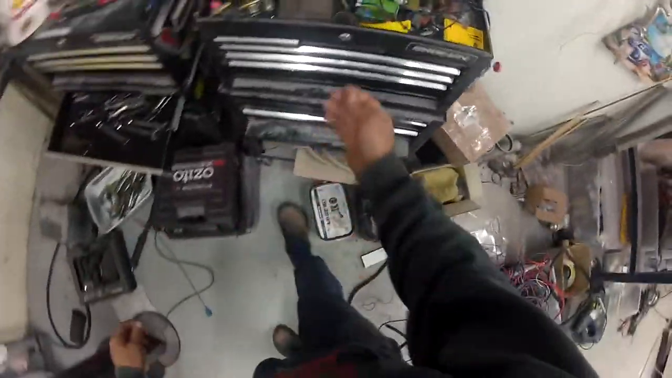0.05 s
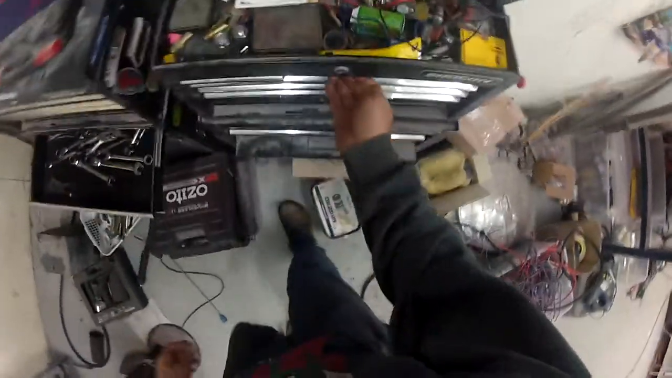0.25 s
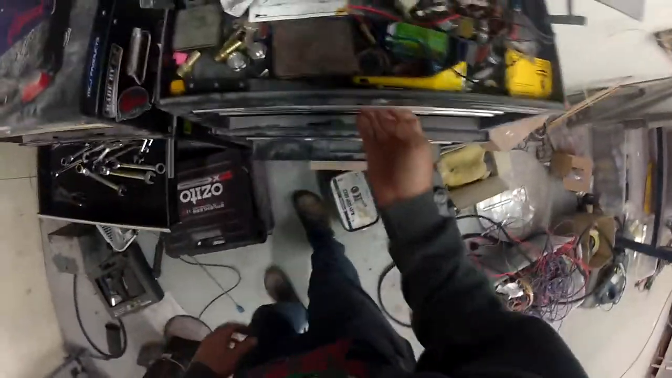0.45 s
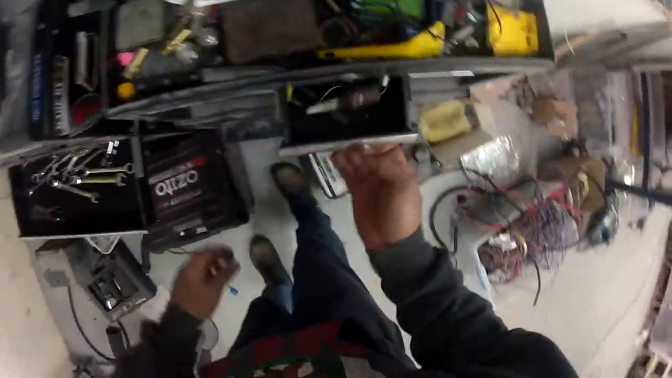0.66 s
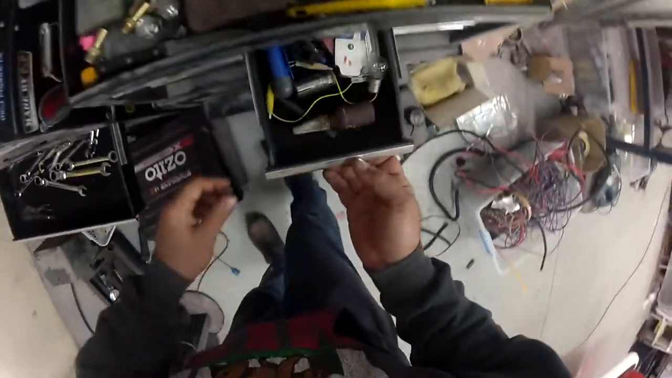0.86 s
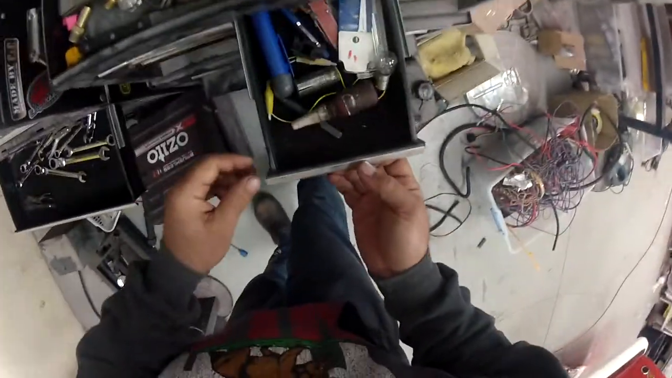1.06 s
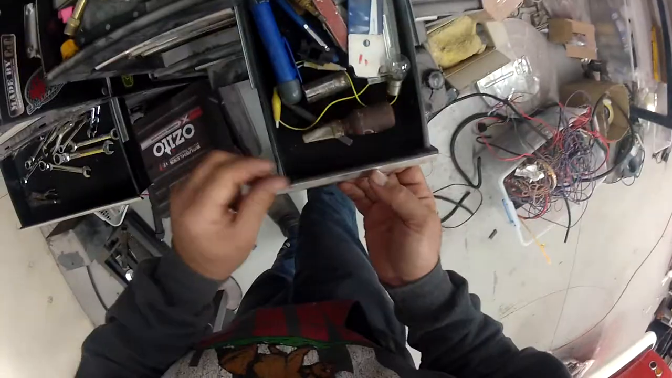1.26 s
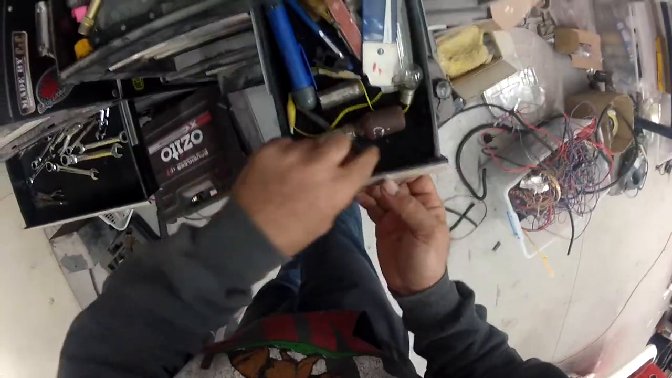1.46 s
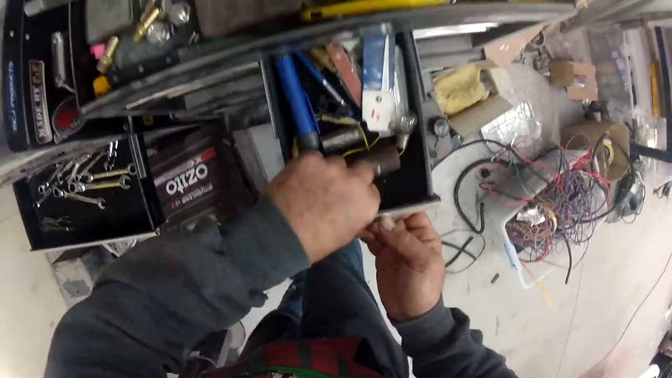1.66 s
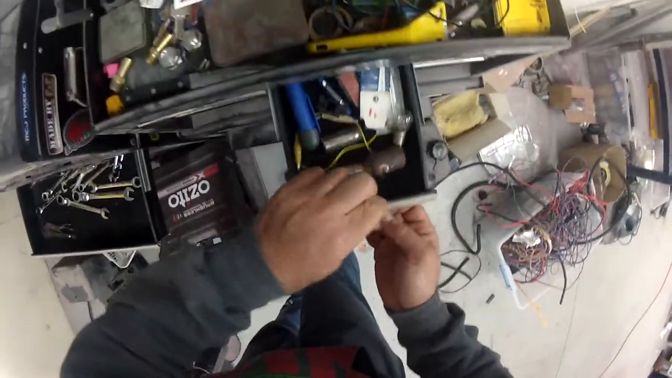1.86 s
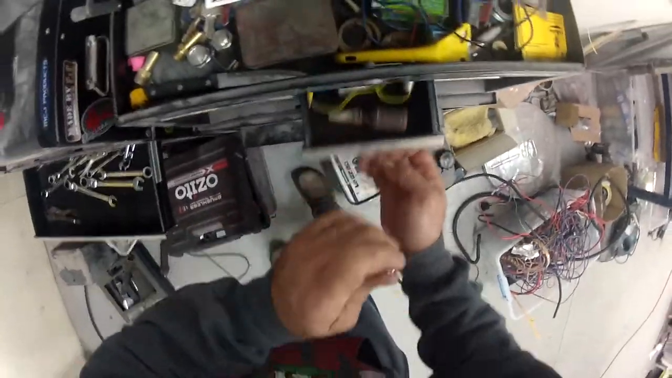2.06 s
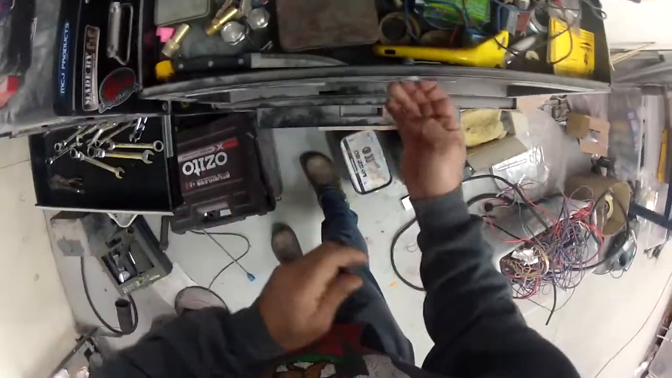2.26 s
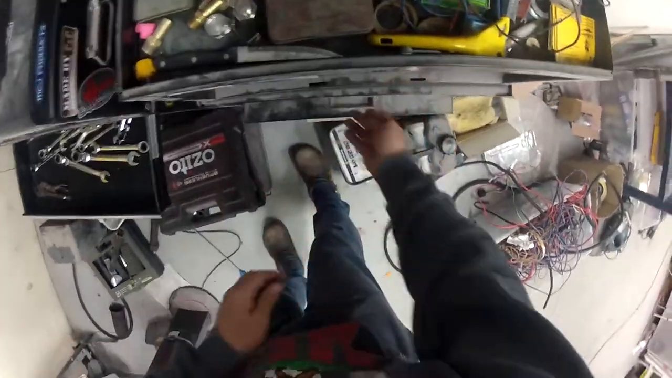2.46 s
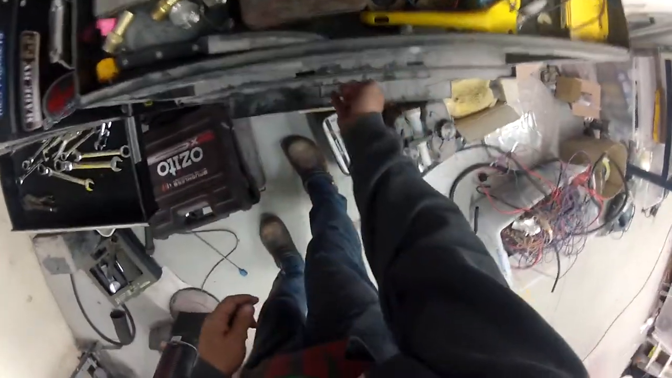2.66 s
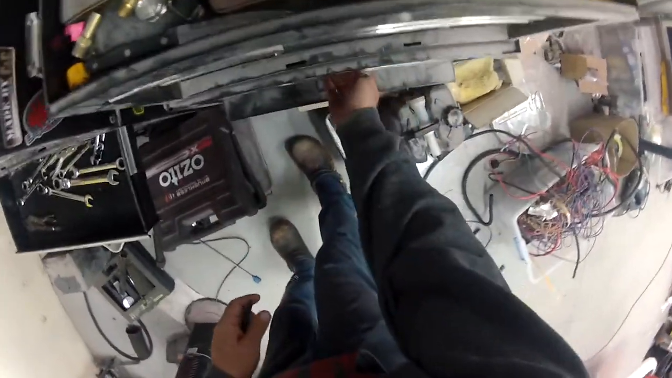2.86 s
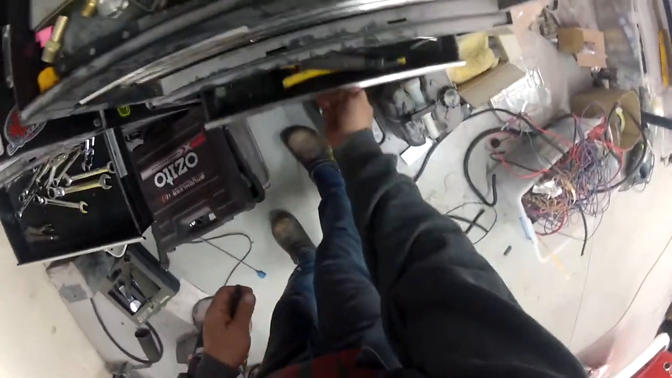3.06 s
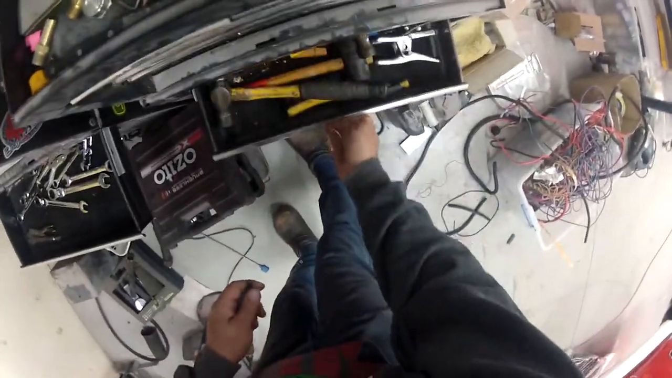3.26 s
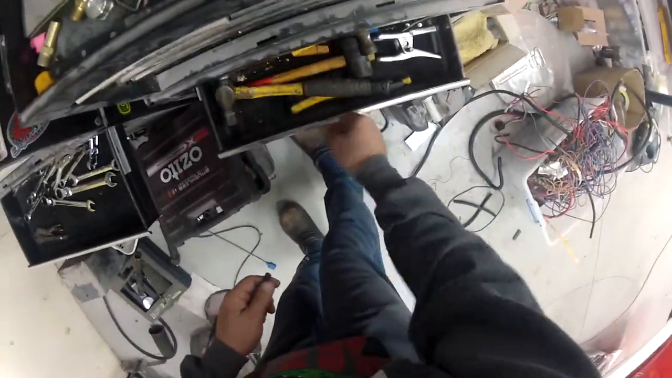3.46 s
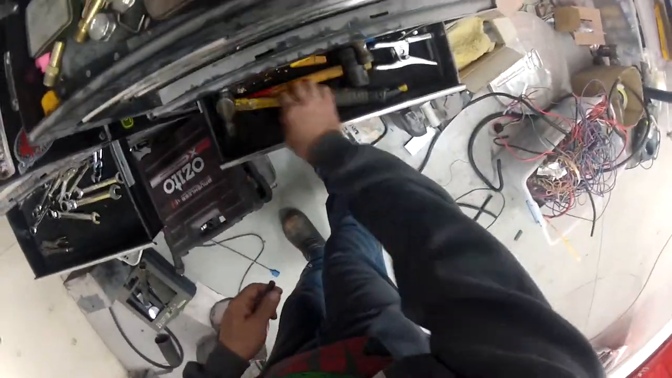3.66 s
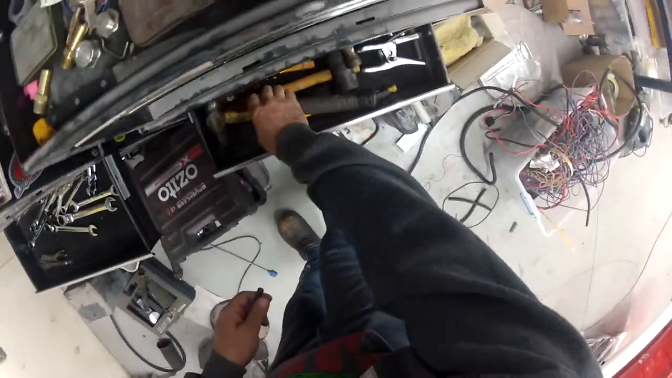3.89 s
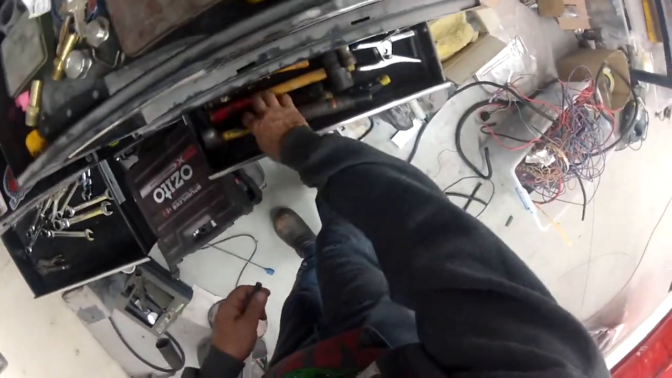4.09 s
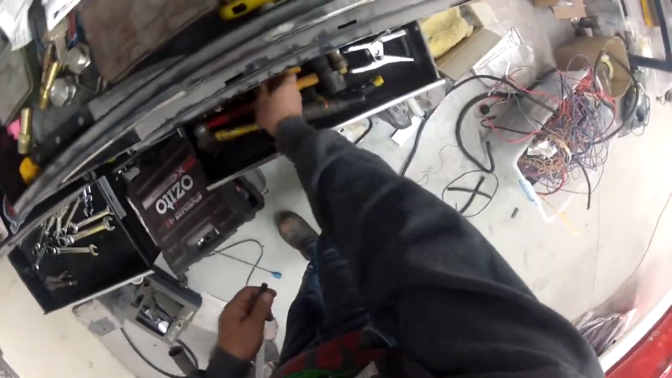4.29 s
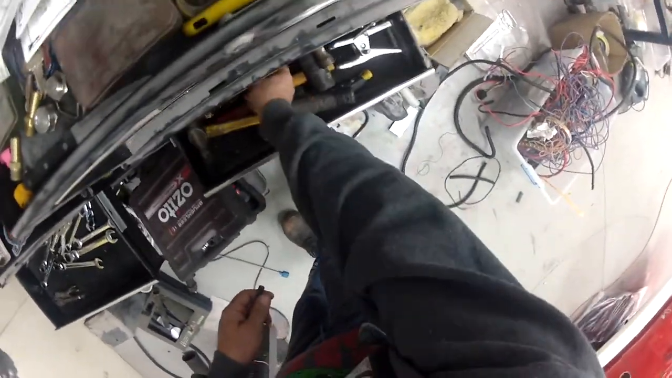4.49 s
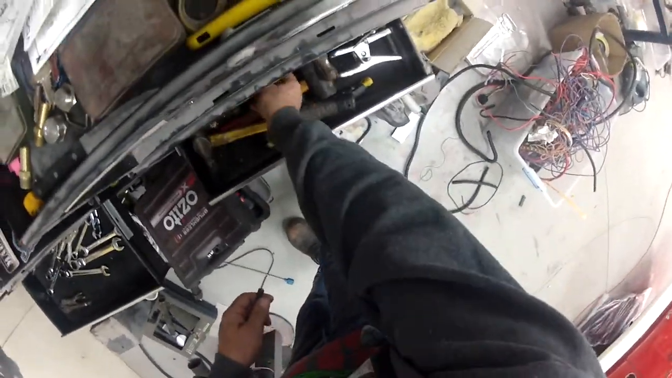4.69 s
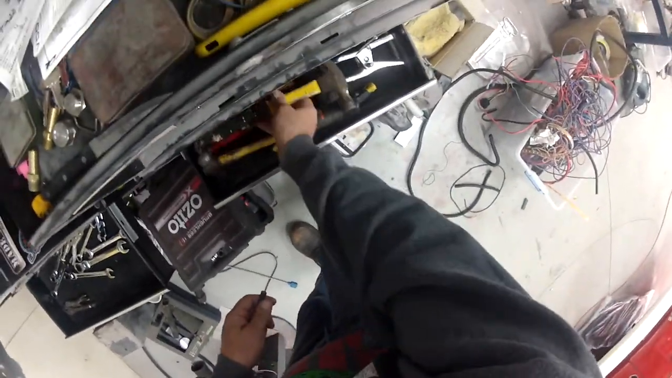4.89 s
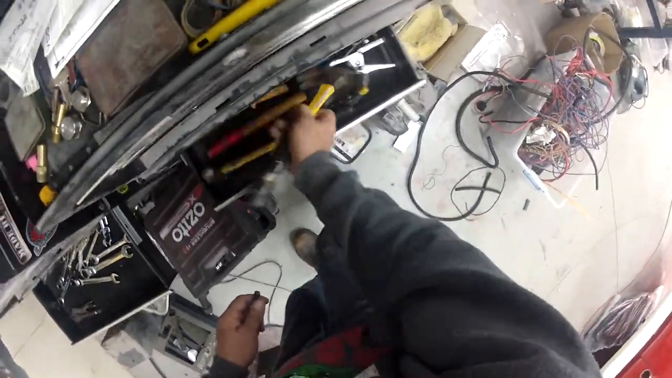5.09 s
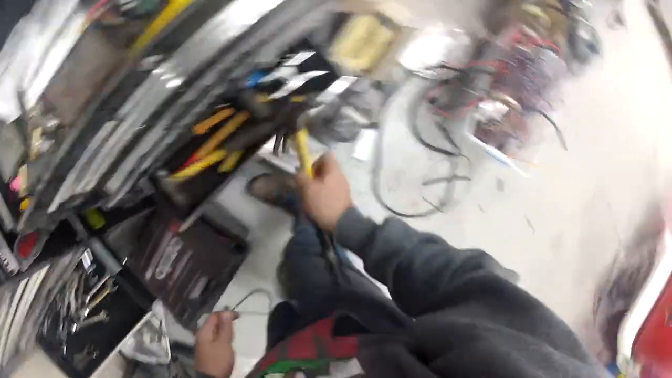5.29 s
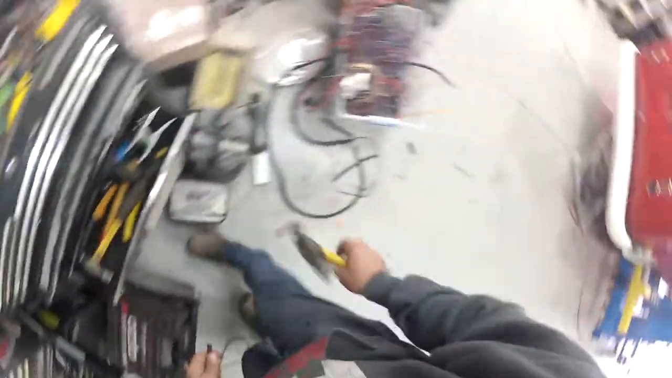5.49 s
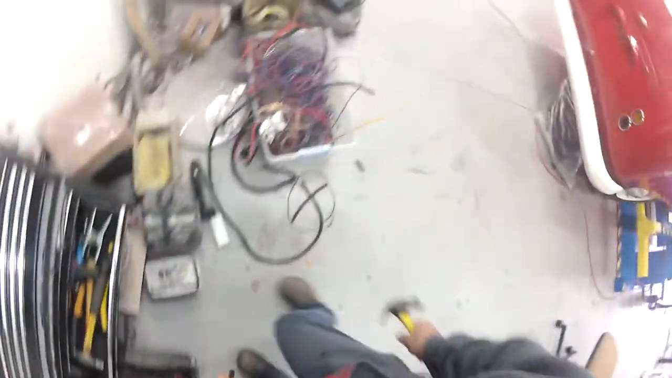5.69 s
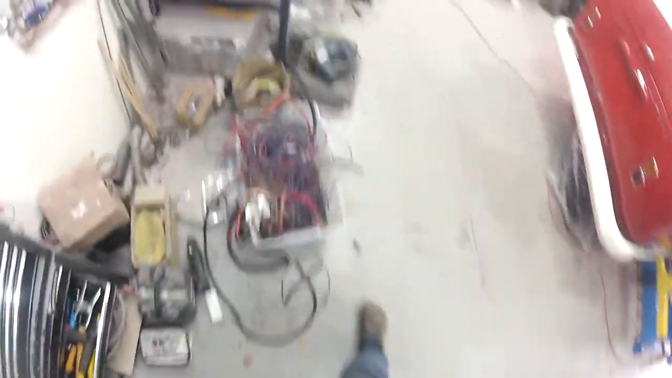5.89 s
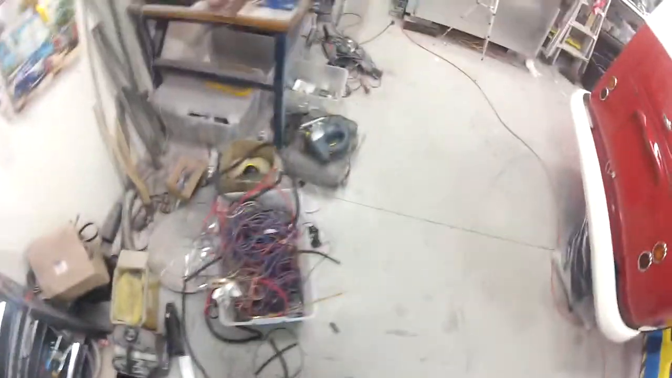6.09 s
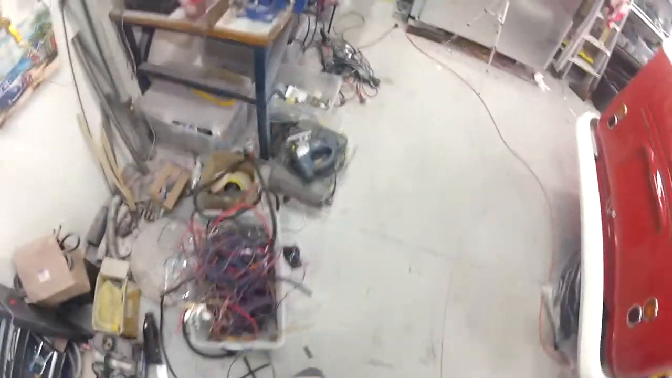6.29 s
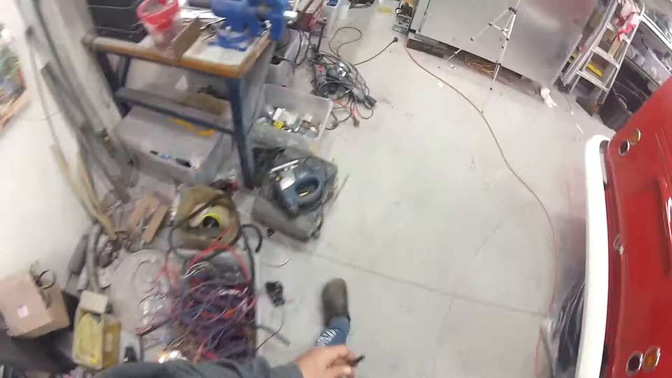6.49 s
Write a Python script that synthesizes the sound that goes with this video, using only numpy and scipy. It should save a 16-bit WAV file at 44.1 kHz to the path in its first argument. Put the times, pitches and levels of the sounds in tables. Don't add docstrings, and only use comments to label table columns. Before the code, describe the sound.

In a hard-walled workshop, a small steel drawer rattles open with a knock at its stop, pauses, then rolls back and slams hard with a ringing double bang. A wider drawer rumbles out, tools jostling. Hand tools are rummaged with heavy low knocks, one is lifted out with a last clunk, and soft steps follow. The close microphone is boxed in and dull, with faint grainy treble.

```python
import sys
import numpy as np
from scipy import signal
from scipy.fft import rfft, irfft, next_fast_len
from scipy.io import wavfile
from scipy.ndimage import uniform_filter1d

SR = 44100
rng = np.random.default_rng(int(sys.argv[2]) if len(sys.argv) > 2 else 0)


def output_pcm(signal):
    pcm = np.clip(np.atleast_2d(signal).T, -1, 1) * 32767
    wavfile.write(sys.argv[1], SR, np.round(pcm).astype(np.int16))


def field_ratio(decibels):
    return 10 ** (np.asarray(decibels, dtype=float) / 20)


N = 288546
TIME = np.arange(N) / SR

# [f/Hz, level per Hz/dB]
HUSH = [(15, -36), (25, 1), (180, -3.5), (504, -8.5), (728, -8), (1070, -20), (1660, -29.5), (2400, -44),
        (3970, -40.5), (5110, -19.5), (6000, -37), (7800, -79), (13200, -120)]
HUSH_DB = -65.5
# [f/Hz, t60/s]
SHOP_DECAY = [(100, 0.2), (400, 0.55), (1000, 0.5), (3000, 0.44), (6000, 0.45)]
# [deep level/dB, tray level/dB, clatter level/dB, floor level/dB]
IDLE_DB = (-69.5, -86, -77.5, -72)
# [t/s, level/dB, rise over 60 dB/s, fall over 60 dB/s]
THUMPS = [(0.51, -61, .6, .3), (0.87, -67, .1, .3), (1.2, -60, 0.82, 1.8), (1.781, -67, 1.1, .2),
          (2.17, -22, 0.065, 0.058), (2.37, -36, .13, 0.056), (2.48, -52, 0.49, 0.84),
          (2.95, -49, .15, 1.1), (3.155, -30, .2, .12), (3.33, -47, 0.25, 0.93), (4.15, -39.5, .35, 0.18),
          (4.45, -35, .04, .3), (4.52, -33, .15, .15), (4.64, -46, 0.27, .5), (4.94, -38, .25, 0.74),
          (5.39, -25, 0.04, 0.16), (5.54, -31, 0.14, 0.16), (5.6, -48.5, .1, .2), (5.70, -48, .2, 1.2),
          (6.03, -42.5, 0.1, .4), (6.1, -41, 0.33, 0.27), (6.17, -46, 0.27, 0.064), (6.54, -54, 0.77, .3)]

# [t/s, level/dB]
SMALL_PULL = [
    (0.46, -48),
    (0.49, -50),
    (0.56, -49),
    (0.66, -43),
    (0.79, -47),
    (0.85, -50),
    (0.87, -50),
]
SMALL_PUSH = [
    (1.72, -68),
    (1.79, -48.5),
    (1.83, -43.5),
    (1.97, -43),
    (2.04, -40.5),
    (2.11, -43),
    (2.15, -41),
]
WIDE_PULL = [
    (2.91, -51),
    (2.95, -39.5),
    (3.01, -39),
    (3.09, -34),
    (3.17, -28),
    (3.29, -35.5),
    (3.52, -50),
    (3.66, -62),
    (3.82, -74),
]
# [deep level/dB, tray level/dB, clatter level/dB]
SMALL_MIX = (-10, 0.1, -18.5)
WIDE_MIX = (-1, -2.5, -21)
# [t/s, deep level/dB, t60/s, tray level re deep/dB, clatter level re deep/dB]
SHAKES = [(0.163, -60, 1, -1, -2), (0.464, -43.5, 0.37, -15, -25), (0.875, -45, 0.85, 9, -7),
          (1.11, -55, 0.78, 4, -12), (1.46, -62, 2.3, 1, -5), (2.17, -37, 1, 3.5, -21),
          (2.24, -45.5, 1, 6, -3), (2.296, -36, 0.42, 4, -3), (2.44, -45.5, 1.7, -11.5, -26),
          (2.69, -48.5, 0.75, 0.5, -32), (2.84, -39, 0.71, -14, -28), (3.868, -50, 2.1, -6.5, -21),
          (4.11, -39.5, 0.57, -3.5, -28), (4.30, -51.5, 0.93, -7, -24), (4.46, -33, 0.89, -8, -23.5),
          (4.62, -52, 2.3, -4.5, -31), (4.744, -32.5, 0.36, -18, -14.5), (4.875, -27.5, 0.53, -9.5, -22),
          (4.96, -28.5, 0.41, -3.5, -22.5), (5.2, -55.5, 1.9, -6, -10), (5.385, -36, 1.01, -6, -9.5),
          (5.70, -52.5, 0.37, -3.5, -28.5), (5.951, -62.5, 1.2, 2.5, -3), (6.03, -59.5, 0.93, -5, -1),
          (6.381, -65, 1.4, 0, 0.5)]
SHAKE_SWELL_S = 0.019
TRAY_SETTLES, CLATTER_SETTLES = 1.14, 1.36
# [t/s, level/dB]
RUNNERS = [
    [(0.462, -53), (0.518, -65), (0.64, -55), (0.824, -61), (0.908, -57), (1.22, -73), (1.3, -87)],
    [(1.74, -72), (1.842, -56), (1.972, -61), (2.13, -54)],
]

# [f/Hz, level/dB, t60/s]
FRAME_MODES = [(134, -6.5, 0.27), (171.4, 0.5, 0.6), (190.8, 8.5, 0.97), (246, -6, 0.62),
               (305.6, 0.5, 0.48), (355, 3.5, 0.097), (378.7, -4.5, 0.32)]
# [f/Hz, level/dB, t60/s]
TRAY_MODES = [(490, -4.5, 0.025), (535, 1, 0.077), (557, -17, 0.075), (646.8, 5.5, 0.12),
              (669.4, -4.5, 0.16), (730.8, 7, 0.1), (786.3, 2, 0.097), (853, -0.5, 0.025)]
RUMBLE_EVENNESS = .5
# [f/Hz, level per Hz/dB]
BODY = [(53, -37.5), (90, -4.5), (135, -1), (235, 1.5), (275, -8.5), (380, -2.5), (435, -6), (711, 2),
        (909, -22.5), (1300, -8.5), (1690, -34.5), (2860, -120)]
# [f/Hz, level per Hz/dB]
CLATTER = [(590, -39), (1000, -7), (1140, -2.5), (1560, -9.5), (2440, -1.5), (2750, -8.5), (3320, -12),
           (4650, -11), (5570, -28), (6000, -36), (7800, -57), (13200, -120)]
# [f/Hz, level per Hz/dB]
SCUFF_COLOUR = [(820, -56), (1400, -13), (1960, -11), (2140, -2), (2640, 0.5), (4160, -12), (4880, -1),
                (6000, -29), (7800, -63), (13200, -120)]
# [f/Hz, level per Hz/dB]
CRACK = [(650, -25), (1100, -2), (1240, -7), (2210, -3.5), (2750, 1), (3330, -8.5), (4650, -7.5),
         (6000, -22.5), (7800, -56.5), (13200, -120)]

# [t/s, level/dB, rise/s, fall/s]
SCUFFS = [
    (0.5437, -41.5, 0.022, 0.034),
    (5.27, -57, 0.082, 0.082),
    (5.42, -48, 0.021, 0.033),
    (4.7, -62, 0.0029, 0.019),
    (3.014, -52.5, 0.0059, 0.022),
    (5.92, -69.5, 0.074, 0.06),
    (6, -69, 0.021, 0.025),
    (6.53, -63.5, 0.025, .03),
]
# [t/s, peak level/dB, f/Hz]
TICKS = [(0.2404, -50, 2340), (0.4284, -62, 1910), (1.1344, -57, 2720), (1.267, -50.5, 2900),
         (1.8755, -58, 4600), (1.895, -48, 3020), (1.901, -39, 4070), (1.911, -46, 4000),
         (2.5945, -73, 3000), (2.6848, -54, 1920), (3.9514, -57, 4600), (3.9873, -62, 1990),
         (4.0186, -54, 5000), (4.3395, -53, 4450), (5.7563, -48, 3550), (5.795, -51, 3730)]
# [t/s, peak level/dB, f/Hz]
SMALL_TAPS = [(0.525, -31, 431), (0.59, -36, 611), (0.614, -36, 767), (0.647, -37, 716), (0.669, -31, 676),
              (0.799, -34, 678), (0.93, -27, 748), (0.944, -26, 697), (1.003, -29, 759), (1.037, -36, 681),
              (1.115, -39, 684), (1.176, -44, 614), (1.771, -35, 651), (1.835, -33, 654),
              (1.875, -31.5, 635), (1.929, -38, 746), (1.969, -33, 751), (2.003, -30.5, 781),
              (2.049, -32, 694), (2.209, -15, 746), (2.219, -15, 315), (2.367, -23, 318), (2.409, -27, 406),
              (2.449, -23, 353), (2.562, -40, 358)]
# [t/s, peak level/dB, f/Hz]
WIDE_TAPS = [(2.841, -24.5, 301), (2.919, -35, 301), (2.969, -24, 686), (3.034, -27, 670),
             (3.101, -22, 482), (3.119, -23, 301), (3.136, -20, 361), (3.167, -19, 598), (3.179, -18, 640),
             (3.194, -20.5, 328), (3.236, -20.5, 697), (3.249, -24, 708), (3.279, -26, 755),
             (3.314, -29, 452), (3.357, -31.5, 466), (3.462, -37.5, 643), (3.869, -37, 748),
             (3.909, -39, 475), (3.999, -41, 630), (4.129, -31, 352), (4.179, -35, 659), (4.657, -40, 355),
             (4.754, -17.5, 301), (4.899, -19, 485), (4.934, -28, 301), (4.954, -24, 708),
             (4.974, -23, 301), (4.994, -25, 484), (5.227, -51, 436), (5.333, -46, 307), (5.545, -30, 724),
             (5.586, -33, 686.2)]
# [t/s, f/Hz, level/dB, t60/s]
TOOL_RINGS = [(0.098, 1106, -79, .21), (0.164, 1920, -42.5, 0.03), (0.166, 2290, -49, 0.034),
              (0.243, 2360, -61, 0.2), (0.246, 3000, -62, 0.3), (0.739, 1310, -43.5, .045),
              (1.52, 2650, -70, 1.1), (2.123, 1040, -26, 0.03), (2.163, 1040, -26, 0.033),
              (2.165, 2750, -30, 0.077), (2.303, 715, -25.5, 0.095), (3.301, 562, -48, 1.42),
              (4.113, 2650, -55, 0.12), (4.121, 2487, -58, 0.37), (4.125, 2729, -60, 0.25),
              (4.115, 3806, -63, 0.2), (4.11, 1150, -55, 0.05), (0.165, 2850, -60, .08),
              (0.17, 2073, -58, 0.18), (3.871, 2200, -55, 0.034), (3.871, 1300, -56, 0.037),
              (3.89, 3000, -67, .05), (2.122, 1350, -30, 0.028), (2.19, 2600, -45, .12),
              (2.305, 2400, -43, .05), (2.685, 2800, -64, .15), (2.164, 1500, -24, .012),
              (2.165, 3300, -26, .01), (.872, 1400, -38.5, .04)]
# [t/s, f/Hz, level/dB, t60/s]
PANEL_RINGS = [(0.163, 105, -41.5, 0.2), (0.464, 190, -43, 0.13), (.869, 213, -24.5, 0.088),
               (1.453, 374, -27.5, 0.032), (1.451, 198, -36, 0.11), (2.163, 45, -23, .1),
               (2.163, 516, -10, .014), (2.164, 780, -13, .014), (4.451, 500, -21, .035),
               (4.737, 560, -22, .045), (0.65, 390, -47, .3), (0.75, 210, -46, .2), (2.266, 732, -27, .035),
               (5.393, 500, -24, .04), (5.53, 130, -36, .1), (2.12, 330, -27, .03), (1.8, 200, -42, .3),
               (.869, 330, -17, 0.015), (.87, 804, -21, 0.033), (2.165, 209, -21.5, .15),
               (2.84, 288, -35.5, 0.31), (3.871, 105, -39, .3), (4.438, 87.6, -39.5, 1),
               (4.444, 201, -32, 0.084), (4.736, 251, -16, 0.09), (4.875, 245, -20.5, 0.12),
               (4.749, 298, -19, 0.11), (4.81, 246, -26.5, 0.16), (6.382, 258, -39, 0.067),
               (.869, 265, -21, 0.05), (5.383, 98, -28, 0.23), (5.539, 97.6, -43, 1)]

# [t/s, peak level/dB, panel f/Hz, crack level re peak/dB, room level/dB]
SMALL_KNOCKS = [(0.098, -45.5, 636, -13.5, -12), (0.163, -24, 417, -31.5, -25), (0.466, -30, 338, -30, -9),
                (0.487, -31.5, 817, -26, -18), (0.737, -24, 690, -25, -19), (0.778, -26, 775, -42, -22),
                (0.868, -10.5, 339, -20.5, -22), (1.452, -21, 748, -22, -21.5),
                (1.793, -30.5, 700, -23, -12.5), (2.12, -24, 810, -14, -28),
                (2.125, -12.5, 339, -24.5, -22.5), (2.162, -5, 376, -19.5, -16.5),
                (2.188, -12, 724, -45, -18), (2.263, -12, 218, -33, -22.5), (2.301, -8.5, 248, -27, -16),
                (2.311, -15.5, 664, -23.5, -22), (2.324, -12.5, 349, -39, -13),
                (2.343, -20, 552, -36, -17.5), (2.668, -42, 635, -24, 1)]
# [t/s, peak level/dB, panel f/Hz, crack level re peak/dB, room level/dB]
WIDE_KNOCKS = [(2.837, -24.5, 280, -27.5, -10.5), (2.955, -28, 720, -26.5, -16),
               (3.083, -27, 694, -26, -16), (3.158, -26, 260, -19, -9), (3.252, -25.5, 192, -34, -10.5),
               (3.869, -35.5, 725, -26, -18), (4.096, -22, 148.8, -37, -18),
               (4.109, -43, 675, -10.5, -10.5), (4.153, -29.5, 203, -42, -11.5),
               (4.44, -26, 652, -11.5, -14.5), (4.45, -19, 463, -19.5, -18), (4.714, -34, 740, -37, -20),
               (4.733, -12.5, 255, -35, -14), (4.786, -18.5, 238, -35, -15),
               (4.857, -20.5, 540, -32, -22.5), (4.873, -14, 211, -35, -17.5),
               (4.913, -20.5, 550, -30, -15.5), (4.96, -34, 169, -11, -11), (5.371, -31, 420, -8, -16),
               (5.392, -14, 665, -23, -15), (5.411, -22.5, 696, -12.5, -17), (5.539, -53, 178, -31, -27),
               (6.055, -41.5, 308, -3.5, -14), (6.381, -32.5, 254.4, -22.5, -19)]
SMALL_THUD_S, WIDE_THUD_S, THUD_CYCLES = 0.026, 0.04, 2

HOLD_HZ = 12000


def rms_one(x):
    return x / np.sqrt(np.mean(x ** 2) + 1e-20)


def at_hz(points, hz):
    table_hz, values = np.transpose(points)
    return np.interp(np.log(hz), np.log(table_hz), values)


def filtered(x, order, hz, kind):
    return signal.sosfilt(signal.butter(order, hz, kind, fs=SR, output="sos"), x)


def ring(clicks, hz, t60):
    radius = field_ratio(-60 / (t60 * SR))
    angle = 2 * np.pi * hz / SR
    return signal.lfilter([0, np.sin(angle)], [1, -2 * radius * np.cos(angle), radius ** 2], clicks + 1e-18)


def coloured(x, spectrum):
    bottom, top = spectrum[0][0], spectrum[-1][0]
    edges = bottom * 2 ** np.arange(0, np.log2(top / bottom), 1 / 3)
    out = 0
    for k, (low, high) in enumerate(zip(edges, edges[1:])):
        band = filtered(x + 1e-18, 2, [low, high], "band")
        out = out + field_ratio(at_hz(spectrum, np.sqrt(low * high))) * band * (-1) ** k
    return out


def grains(per_s, spread_db):
    strength_db = spread_db * np.minimum(rng.exponential(1, N), 4)
    size = field_ratio(strength_db) * rng.choice([-1, 1], N)
    return size * (rng.random(N) < per_s / SR)


def quiet_hush():
    return field_ratio(HUSH_DB) * rms_one(coloured(rng.standard_normal(N), HUSH))


def workshop(x, first_s):
    t = TIME[:SR]
    tail = 0
    for low in 45 * 2.0 ** np.arange(7):
        band = filtered(rng.standard_normal(SR), 2, [low, 2 * low], "band")
        tail = tail + band * field_ratio(-60 * t / at_hz(SHOP_DECAY, 2.27 * low))
    tail = tail * (1 - np.exp(-(t / first_s) ** 2))
    return signal.fftconvolve(x, tail / np.sqrt(np.sum(tail ** 2)))[:N]


def motion():
    power = np.ones((4, N)) * field_ratio(IDLE_DB)[:, None] ** 2
    for rows, mix in [(SMALL_PULL, SMALL_MIX), (SMALL_PUSH, SMALL_MIX), (WIDE_PULL, WIDE_MIX)]:
        s, db = np.transpose(rows)
        speed_db = np.interp(TIME, s, db, left=-150, right=-150)
        power[:3] += field_ratio(speed_db + np.array(mix)[:, None]) ** 2
    settles = np.array([[1], [TRAY_SETTLES], [CLATTER_SETTLES]])
    for s, db, t60, tray_db, clatter_db in SHAKES:
        t = TIME[:N - round(s * SR)]
        swell = 1 - np.exp(-t / SHAKE_SWELL_S)
        shape = swell * field_ratio(db + 2 - 60 * t / t60 * settles)
        power[:3, -len(t):] += (field_ratio([[0], [tray_db], [clatter_db]]) * shape) ** 2
    for s, db, rise, fall in THUMPS:
        slope_s = np.where(TIME < s, rise, fall)
        power[3] += field_ratio(db - 60 * np.abs(TIME - s) / slope_s) ** 2
    return 10 * np.log10(power)


def panel(contacts, modes, low_hz, high_hz, broad_db):
    dealt = rng.integers(0, len(modes), N)
    rings = 0
    for k, (hz, db, t60) in enumerate(modes):
        rings = rings + field_ratio(db) * rms_one(ring(contacts * (dealt == k), hz, t60))
    broad = field_ratio(broad_db) * rms_one(coloured(contacts, BODY))
    rumble = rms_one(filtered(rms_one(rings) + broad, 3, [low_hz, high_hz], "band"))
    swell = uniform_filter1d(uniform_filter1d(rumble ** 2, size=500), size=500) + .02
    return rms_one(rumble / swell ** (RUMBLE_EVENNESS / 2))


def rolling(deep_db, tray_db, clatter_db, thud_db):
    contacts = grains(per_s=2500, spread_db=2.2)
    deep = panel(contacts, FRAME_MODES, low_hz=105, high_hz=413, broad_db=4.5)
    tray = panel(contacts, TRAY_MODES, low_hz=406, high_hz=926, broad_db=-8.0)
    fine = grains(per_s=7700, spread_db=1.5)
    clatter = rms_one(coloured(contacts * field_ratio(-10.5) + fine, CLATTER))
    thud = rms_one(filtered(rng.standard_normal(N), 3, [55, 115], "band"))
    floor = filtered(field_ratio(thud_db - 6.0) * thud, 2, 45, "high")
    return field_ratio(deep_db + 2.5) * deep + field_ratio(tray_db - 1.5) * tray + field_ratio(clatter_db + 1.0) * clatter + floor


def runners():
    whirr = rms_one(ring(grains(per_s=7000, spread_db=1.0), 930, 0.0045))
    out = 0
    for rows in RUNNERS:
        s, db = np.transpose(rows)
        out = out + field_ratio(np.interp(TIME, s, db, left=-120, right=-120) + 2.5) * whirr
    return out


def scuffs():
    drag = np.zeros(N)
    for s, db, rise, fall in SCUFFS:
        drag += field_ratio(db) * np.exp(-((TIME - s) / np.where(TIME < s, rise, fall)) ** 2)
    return drag * rms_one(coloured(rng.standard_normal(N), SCUFF_COLOUR))


def ringing_steel():
    strikes = TOOL_RINGS + PANEL_RINGS
    for s, db, hz in TICKS:
        click = (s, 0.56 * hz, db, 2.5 / hz)
        strikes = strikes + [(s, hz, db, 21.5 / hz), click]
    for s, db, hz in SMALL_TAPS + WIDE_TAPS:
        clinks = [(s, hz * ratio, db - 30, .012) for ratio in (3.3, 5.6)]
        strikes = strikes + [(s, hz, db - 6, 20 / hz)] + clinks
    out = np.zeros(N)
    for s, hz, db, t60 in strikes:
        start = round(s * SR)
        t = TIME[:min(round(t60 * SR), N - start)]
        twin = 0.94 * np.sin(2 * np.pi * 1.012 * hz * t) * field_ratio(-40 * t / t60)
        pair = np.sin(2 * np.pi * hz * t) + twin
        hit = field_ratio(db - 60 * t / t60) * (1 - np.exp(-1.8 * hz * t)) * pair
        no_push = signal.butter(2, hz / 3, "high", fs=SR)
        out[start:start + len(t)] += signal.lfilter(*no_push, hit)
    return out


def knocks():
    dry, send = np.zeros((2, N + SR))
    t = TIME[:SR // 4]
    rows = [(*row, SMALL_THUD_S) for row in SMALL_KNOCKS] + [(*row, WIDE_THUD_S) for row in WIDE_KNOCKS]
    white = rng.standard_normal((2, len(rows), len(t)))
    unevenness = uniform_filter1d(white[0], size=40) * np.sqrt(40)
    rattle = white[1] * field_ratio(3.5 * unevenness)
    low = rms_one(filtered(coloured(white[0], BODY), 4, 930, "low"))
    high = rms_one(coloured(rattle, CRACK))
    for k, (s, db, hz, crack_db, room_db, base_s) in enumerate(rows):
        length = base_s + THUD_CYCLES / hz
        swell = (1 - np.exp(-t * hz * 0.81)) * field_ratio(-60 * t / length)
        note = swell * np.sin(2 * np.pi * hz * t)
        around = rms_one(filtered(low[k], 2, [hz / 3.07, hz * 2.31], "band"))
        shudder = field_ratio(-5.5) * around * (1 - np.exp(-t / 0.00086)) * field_ratio(-60 * t / (1.69 * length))
        rise = .0003 * field_ratio(-.9 * (db + crack_db + 35))
        fall = np.exp(-t / 0.0051) + field_ratio(-8) * np.exp(-t / 0.031)
        crack = field_ratio(crack_db - 2) * high[k] * (1 - np.exp(-t / rise)) * fall
        hit = field_ratio(db + 3.5) * (note + shudder + crack)
        at = slice(round(s * SR), round(s * SR) + len(t))
        dry[at] += hit
        send[at] += field_ratio(room_db) * hit
    return filtered([dry[:N], send[:N]], 2, 110, "high")


def scene():
    hush = quiet_hush()
    moving = rolling(*motion()) + runners()
    small = scuffs() + ringing_steel()
    direct, send = knocks()
    room = workshop(field_ratio(7.0) * send + field_ratio(-12.0) * small, first_s=0.0029)
    return (direct + small + room + moving + hush)[None]


def low_pass(x):
    return signal.sosfilt(signal.butter(12, 16500, fs=SR, output="sos"), x)


def record(dry):
    x = filtered(dry, 8, 5600, "low")
    x = .6 * np.tanh(x / .6)
    sampled = x * (1 + 2 * np.cos(2 * np.pi * HOLD_HZ * TIME))
    size = next_fast_len(N)
    hz = np.arange(size // 2 + 1) * SR / size
    held = irfft(rfft(sampled, size) * np.sinc(hz / HOLD_HZ), size)[:, :N]
    held = signal.sosfilt(signal.cheby2(10, 40, 16200, fs=SR, output="sos"), held)
    return low_pass(held)


dry = scene()
out = record(dry)
output_pcm(out)
```